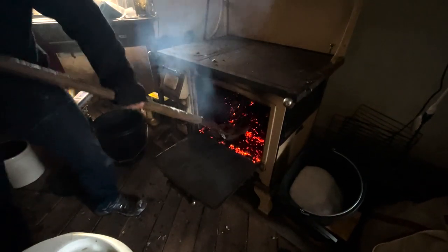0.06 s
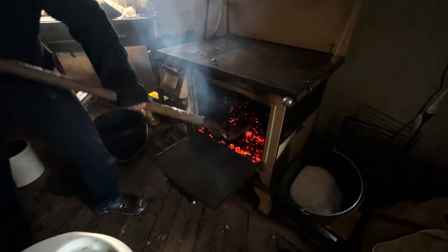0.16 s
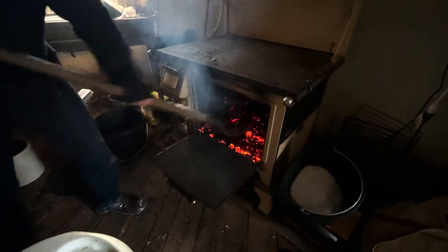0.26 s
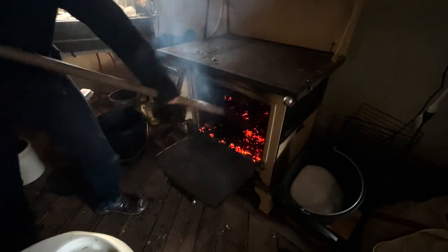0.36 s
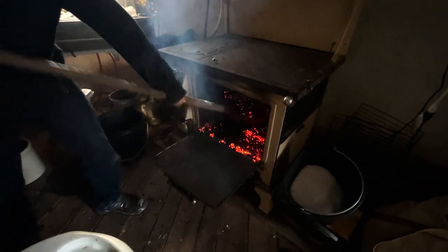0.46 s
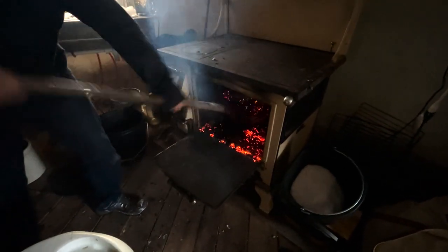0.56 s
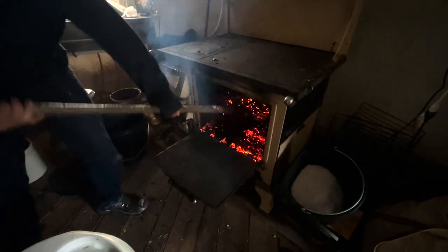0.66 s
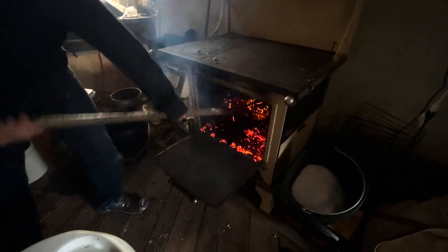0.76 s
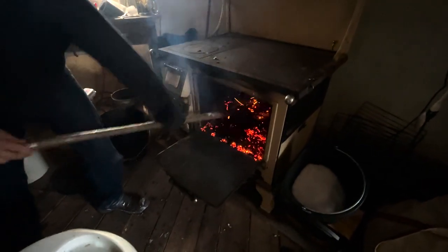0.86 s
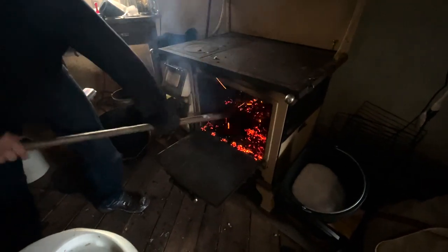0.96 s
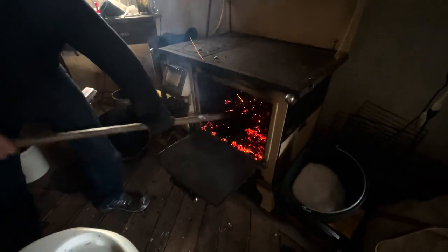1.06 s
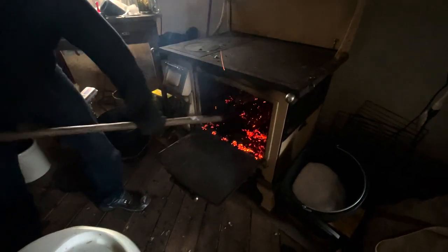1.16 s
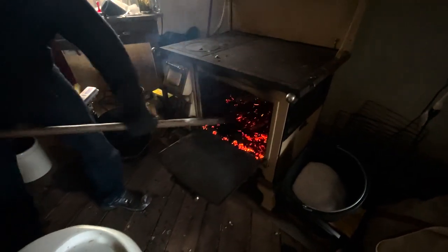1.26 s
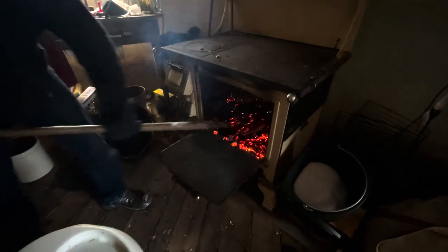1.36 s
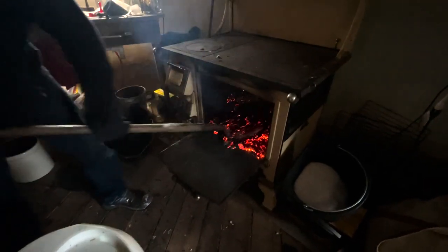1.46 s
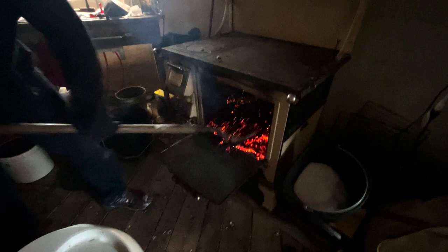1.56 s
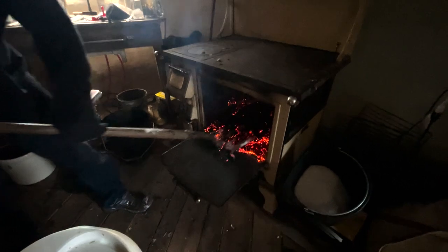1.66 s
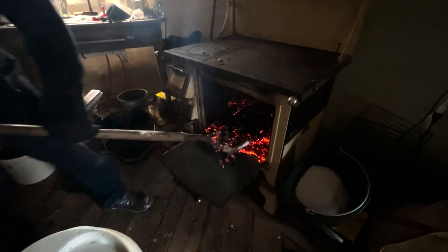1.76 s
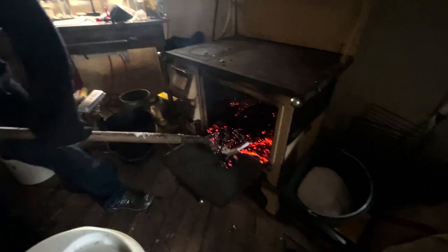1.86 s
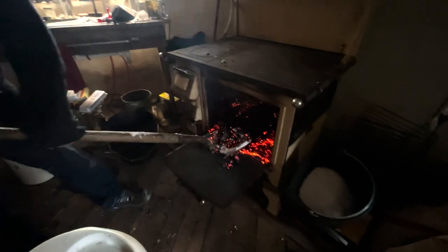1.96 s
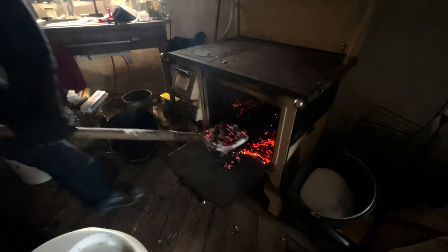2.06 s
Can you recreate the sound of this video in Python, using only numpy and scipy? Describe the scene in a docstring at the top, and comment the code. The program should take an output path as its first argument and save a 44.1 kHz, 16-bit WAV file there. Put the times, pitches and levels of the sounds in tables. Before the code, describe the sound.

A steel poker bangs and rakes through hot coals inside a stove, then embers spill.

```python
"""A steel poker groans and scrapes in the firebox of an iron wood stove, pushed in and dragged back, in a small room.
Stick-slip contacts and knocks drive damped plate modes: boom, clank, scrape; some slips lock to one pitch.
Coals crunch under it: dense random cracks, coloured; heavy blows also shake the bed and zing the tip.
Then embers spill over the sill and patter on ringing sheet metal; a few clink as decaying sines.
Shaped noise makes the faint draught throughout."""
import sys
import numpy as np
from scipy import signal
from scipy.fft import rfft, irfft
from scipy.io import wavfile
from scipy.ndimage import uniform_filter1d

SR = 44100
rng = np.random.default_rng(int(sys.argv[2]) if len(sys.argv) > 2 else 0)


def transcribe(signal):
    """Save signal, clipped to [-1, 1], as a 16-bit WAV file at the path in sys.argv[1]."""
    frames = np.atleast_2d(signal).T
    limited = np.clip(frames, -1, 1)
    pcm = np.round(limited * 32767).astype(np.int16)
    wavfile.write(sys.argv[1], SR, pcm)


N = 92610
TIME = np.arange(N) / SR

# Pitched stick-slip of the poker: start_s, length_s, start_hz, end_hz, peak_db
POKER_GROANS = [(-.06, 0.21, 157, 152, -34.5), (0.454, 0.12, 338, 333.5, -26),
                (.738, 0.032, 121, 110, -15.5), (.9, 0.13, 88.5, 102.2, -23.5),
                (1.1, 0.27, 178.7, 181.3, -35), (1.269, 0.079, 412.4, 372, -26.5),
                (1.672, 0.1, 1332, 1315, -44), (1.79, .12, 1310, 1267, -46.5)]
# Poker drag, before mix trims: time_s, boom_db, grind_db, crunch_db
POKER_DRAG = [(0, -35.5, -35, -38.5), (.09, -48, -54, -47.5), (.14, -49, -49, -43), (.21, -41, -37, -29.5),
              (.255, -22, -24.5, -23), (.32, -28, -24, -29.5), (.385, -18.5, -22, -29.5),
              (.46, -22.5, -25, -35.5), (.52, -27, -28, -30), (.56, -25.5, -24.5, -35.5),
              (.6, -32, -36.5, -39), (.66, -32, -35.5, -41), (.7, -18.5, -27, -43.5),
              (.75, -19.5, -33, -42), (.8, -35, -46.5, -44), (.87, -25, -33, -45), (.94, -35.5, -30, -41),
              (1.02, -32, -33, -41.5), (1.08, -34, -35, -43), (1.14, -29.5, -33.5, -39.5),
              (1.21, -33.5, -40.5, -44), (1.3, -34.5, -32.5, -45.5), (1.36, -41, -52, -50.5),
              (1.41, -44, -44.5, -44), (1.47, -50, -67, -51.5), (1.6, -65, -94, -51), (2, -68, -80, -60.5)]
BOOM, GRIND, CRUNCH = 1, 2, 3  # columns
# Poker knocks, before mix trims: start_s, burst_sigma_s, thud_db, clank_db, rasp_db, crack_db, pitch_ratio
POKER_KNOCKS = [(.003, 0.0033, -36, -41, -44, -78, 0.94), (0.286, 0.017, -24, -25, -25.5, -22.5, 0.97),
                (0.292, 0.0066, -13, -11, -22, -40, 0.93), (0.417, 0.013, -12, -15.5, -54, -23, .74),
                (0.43, 0.021, -14.5, -12.5, -29, -28.5, 0.89), (0.488, 0.0056, -42, -33, -35, -34, 1.37),
                (0.546, 0.005, -29, -32, -44, -26, 1.01), (0.677, 0.018, -37, -21.5, -26.5, -40, 0.87),
                (0.715, 0.032, -26, -24, -44, -56, 0.827), (0.82, 0.017, -26.5, -33, -36, -28.5, 1.02),
                (.896, 0.0055, -30, -33, -37, -32, 0.96), (0.911, 0.034, -32, -21.5, -44, -52, 1.05),
                (1.083, 0.019, -53, -48, -28.5, -29.5, 1), (1.106, 0.0053, -47, -28, -27.5, -27.5, 1.21),
                (1.115, 0.011, -44, -28, -35, -58, 1.064), (1.174, 0.011, -51, -22.5, -51, -70, 1.2),
                (1.218, 0.026, -53, -50, -34, -37, 1.1), (1.259, 0.0056, -39, -48, -23, -49, 1.08),
                (1.286, 0.0013, -51, -48, -26, -32, 1.15), (1.475, 0.011, -56, -56, -40, -49, 1.4)]
THUD, CLANK, RASP, CRACK = 2, 3, 4, 5  # columns
# Stove plate modes: freq_hz, level_db, t60_s
STOVE_MODES = [(79, -0.5, 0.1), (103, 0.5, 0.18), (148.2, -0.5, 0.2), (177.5, -7.5, 0.11),
               (225.8, -3, 0.16), (272, -10.5, 0.028), (336, -0.5, 0.12), (390.3, -0.5, 0.096),
               (445.7, -11, 0.35), (611, -6, 0.069), (864, 1, 0.1), (914, 4, 0.053), (1047, 1, 0.045),
               (1134, -1.5, 0.036), (1370, -6.5, 0.049), (1295, -3.5, 0.066), (1500, -2.5, 0.086),
               (1632, -7.5, 0.12), (1983, -12, 0.18)]
# Sheet metal modes under the embers: freq_hz, level_db, t60_s
SHEET_MODES = [(389.7, -3, 0.24), (564, -13, 0.17), (982.5, -2.5, 0.22), (1200, -11, 0.092),
               (1310, 4.5, 0.11), (1667, 0.5, 0.069), (2960, -12, 0.045), (4150, -3.5, 0.08)]
# Spectrum of the poker's grit: freq_hz, relative_db (per Hz)
GRIT_COLOUR = [(80, -47), (200, -19), (400, -2.5), (800, 7), (1400, -4.5), (1950, 0.5), (2300, -14.5),
               (3200, -11), (6000, -24.5)]
# Spectrum of cracking coals: freq_hz, relative_db (per Hz)
CRUNCH_COLOUR = [(120, -64), (600, 8), (1500, 7), (2300, -1.5), (3000, 1.5), (3900, -1), (4700, -4.5),
                 (6500, -3.5), (8000, -2.5), (9300, -9), (11500, -9.5), (13800, -17)]
# Spectrum of the shaken coal bed: freq_hz, relative_db (per Hz)
BED_COLOUR = [(70, -8), (190, 4.5), (400, 3.5), (850, -2.5), (1400, -14), (2500, -25), (6000, -39)]
# Spectrum of landing embers: freq_hz, relative_db (per Hz)
EMBER_COLOUR = [(150, -9), (350, -4), (580, 7), (800, -8.5), (1350, 3.5), (2400, -3), (4100, -4.5),
                (5500, -7.5), (8000, -11.5), (11000, -20.5), (13800, -20)]
# Spectrum of the draught: freq_hz, relative_db (per Hz)
DRAUGHT_COLOUR = [(20, -22), (37, 1), (60, 6), (100, 0.5), (180, -10.5), (400, -16), (1200, -33),
                  (3000, -68), (8500, -25.5), (13800, -30.5)]
# Flow of embers over the sill: time_s, level_db
EMBER_SPILL = [(1.475, -51), (1.482, -36.5), (1.5, -33), (1.535, -41), (1.56, -34.5), (1.605, -34),
               (1.66, -39), (1.73, -46), (1.82, -45.5), (1.93, -61), (2.01, -49.5), (2.1, -64)]
# Single clinking embers: start_s, pitch_hz, peak_db, t60_s
EMBER_CLINKS = [(1.495, 13700, -35, 0.034), (1.688, 12630, -38, .03), (1.776, 9700, -37, 0.031),
                (1.946, 4000, -39, 0.0057)]
# Microphone colour: freq_hz, left_minus_right_db
MIC_COLOUR = [(100, -0.8), (1800, 0), (2700, 3), (3900, -0.5), (5800, 2.5), (7400, 0), (9200, -10),
              (10300, -4.5), (11500, 0)]

DRAUGHT_DB = -48.5
GROAN_WAVER = 0.0047  # rms share of pitch
THUD_BELOW_HZ, CLANK_BELOW_HZ, STOVE_LOWEST_HZ = 250, 750, 70
MOVE_STEP_S, DETUNE = 0.06, 0.0433  # modes shift by this share as the contact point moves
BLOW_S, BLOW_T60_S = 0.012, 0.37  # span of a knock's level; damping by the poker's pressure
SNAP = 0.24  # first contact of a knock against its unit-energy burst
JUDDERS_PER_S, SLIPS_PER_S, CRACKS_PER_S, EMBERS_PER_S = 350, 900, 4200, 2600
SLIP_SPREAD_DB, CRACK_SPREAD_DB, EMBER_SPREAD_DB = 3, 3.5, 2.5
BOOM_DB, CLANK_DB, SCRAPE_DB, GRIT_DB, RASP_DB = -1.5, -0.5, -13.5, -2.5, -3.5
CRUNCH_DB, BED_DB, SHEET_DB = 3.5, -6, -5.5
CLUMP_DB, CLUMP_SAMPLES = 0.5, 1100  # rms swing; coals give way in clumps
ZING_DB, ZING_HZ, ZING_WIDTH_HZ = -17.5, 7730, 1600
EARLY_T60_S, EARLY_DB, ROOM_T60_S, ROOM_DB = 0.057, 0.5, 0.22, -6.5
SCATTER_HZ, SCATTER_LOWEST_HZ, SCATTER_STEP_S = 360, 118, 0.025
TREBLE_DB, WET_DB = -4.5, -4.5
RIGHT_LAG_S, MOST_LAG_RAD = 6e-5, 0.84
CLIP_TOP, LOWEST_HZ, CUTOFF_HZ = 1, 33, 13850


def from_db(db):
    """Amplitude ratio from dB."""
    return 10 ** (np.asarray(db) / 20)


def unit(x):
    """Scale to unit energy."""
    return x / np.sqrt(np.sum(x ** 2, axis=-1, keepdims=True) + 1e-20)


def level(rows, column=1):
    """Gain over time from one dB column."""
    rows = np.array(rows)
    return from_db(np.interp(TIME, rows[:, 0], rows[:, column]))


def gains(points):
    """Gain per frequency bin, interpolated in dB over log frequency."""
    hz, db = np.transpose(points)
    bins_hz = np.linspace(1, SR / 2, N + 1)
    return from_db(np.interp(np.log(bins_hz), np.log(hz), db))


def shape(x, gain):
    """Filter by a gain per frequency bin."""
    return irfft(rfft(x, 2 * N) * gain)[..., :N]


def colour(x, points):
    """Give a white signal a spectrum and keep its power."""
    gain = gains(points)
    return shape(x, gain / np.sqrt(np.mean(gain ** 2)))


def butter(order, hz, kind, x):
    """Butterworth filter."""
    return signal.sosfilt(signal.butter(order, hz, kind, fs=SR, output="sos"), x)


def draught():
    """The fire's low rumble and faint hiss: shaped noise, wider in stereo at the top."""
    apart = butter(1, 400, "high", rng.standard_normal(N))
    sides = np.outer([1, -1], apart) * 0.84
    return from_db(DRAUGHT_DB) * colour(rng.standard_normal(N) + sides, DRAUGHT_COLOUR)


def groans():
    """Stick-slip locks to one gliding, wavering pitch: the poker groans or squeaks."""
    out = np.zeros(N)
    for start_s, length_s, start_hz, end_hz, peak_db in POKER_GROANS:
        through = np.clip((TIME - start_s) / length_s, 0, 1)
        waver = uniform_filter1d(rng.standard_normal(N), size=400)
        glide_hz = start_hz + (end_hz - start_hz) * through
        hz = glide_hz * (1 + GROAN_WAVER * waver / waver.std())
        swell = np.sqrt(np.abs(np.sin(np.pi * through)))
        phase = 2 * np.pi * np.cumsum(hz * (through > 0)) / SR
        out += from_db(peak_db) * swell * np.sin(phase)
    return out


def contacts(per_s, spread_db):
    """Random tiny impacts of uneven size, power evened over 1100 samples to about rms 1."""
    excess = np.minimum(rng.exponential(1, N), 5)
    sizes = from_db(spread_db * excess) * rng.choice([-1, 1], N)
    clicks = sizes * (rng.random(N) < per_s / SR)
    power = uniform_filter1d(clicks ** 2, size=1100)
    return clicks / np.sqrt(np.maximum(power, 1e-3))


def alternating(modes):
    """Opposite signs for neighbouring modes."""
    return (-1) ** np.arange(len(modes))[:, None]


def ring(force, modes, detune):
    """Drive damped modes that shift a little as the contact point moves."""
    t, step = TIME[:SR // 4], int(MOVE_STEP_S * SR)
    hz, db, t60_s = np.transpose(modes)[..., None]
    decay = from_db(db - 60 * t / t60_s) * alternating(modes)
    out = np.zeros(2 * N)
    for i in range(0, N, step):
        shifted_hz = hz * (1 + detune * rng.uniform(-0.69, 1, hz.shape))
        phase = (2 * np.pi * shifted_hz * t).astype(np.float32)
        response = np.sum(decay * np.sin(phase), axis=0)
        piece = signal.fftconvolve(force[i:i + step], unit(response))
        out[i:i + len(piece)] += piece
    return out[:N]


def knock_force(column, chatter):
    """Each knock is one sharp contact and a dying burst of small ones."""
    force = np.zeros(N)
    for row in POKER_KNOCKS:
        start = max(int(row[0] * SR), 0)
        fade = np.exp(-(TIME[:N - start] / row[1]) ** 2 / 2)
        burst = unit(chatter[start:] * fade)
        burst[0] += SNAP
        force[start:] += from_db(row[column]) * np.sqrt(BLOW_S * SR) * unit(burst)
    return force


def blow(modes, column):
    """Each knock strikes the plates once; the poker's pressure damps them and shifts their pitch."""
    out, t = np.zeros(N + SR), TIME[:SR // 5]
    hz, db, t60_s = np.transpose(modes)[..., None]
    decay = from_db(db - 60 * (1 / t60_s + 1 / BLOW_T60_S) * t) * alternating(modes)
    for row in POKER_KNOCKS:
        start = max(int(row[0] * SR), 0)
        pitch_ratio = row[-1]
        rung = unit(np.sum(decay * np.sin(2 * np.pi * hz * pitch_ratio * t), axis=0))
        out[start:start + len(t)] += from_db(row[column]) * np.sqrt(BLOW_S * SR) * rung
    return out[:N]


def poker():
    """Stick-slip and hard knocks shake the stove's low, middle and high modes; grit rasps along."""
    low = [m for m in STOVE_MODES if m[0] < THUD_BELOW_HZ]
    middle = [m for m in STOVE_MODES if THUD_BELOW_HZ <= m[0] < CLANK_BELOW_HZ]
    high = [m for m in STOVE_MODES if m[0] >= CLANK_BELOW_HZ]
    slips = contacts(SLIPS_PER_S, SLIP_SPREAD_DB)
    grind = slips * level(POKER_DRAG, GRIND)
    judder = contacts(JUDDERS_PER_S, 1.4) * level(POKER_DRAG, BOOM)
    boom = ring(from_db(BOOM_DB) * judder, low, DETUNE)
    blows = blow(low, THUD) + blow(middle, CLANK)
    rasp = from_db(RASP_DB) * knock_force(RASP, slips)
    clank = ring(from_db(CLANK_DB) * grind, middle, 1.16 * DETUNE)
    scrape = ring(from_db(SCRAPE_DB) * grind + rasp, high, DETUNE)
    stove = butter(3, STOVE_LOWEST_HZ, "high", boom + blows + clank + scrape)
    grit = colour(from_db(GRIT_DB) * grind + rasp, GRIT_COLOUR)
    return stove + grit


def coals():
    """Brittle coals crunch in clumps and crack at knocks; heavy blows shake the bed and zing the steel tip."""
    cracks = contacts(CRACKS_PER_S, CRACK_SPREAD_DB)
    clumps = uniform_filter1d(rng.standard_normal(N), size=CLUMP_SAMPLES)
    clump_gain = from_db(CRUNCH_DB + CLUMP_DB * clumps / clumps.std())
    crunch = clump_gain * cracks * level(POKER_DRAG, CRUNCH)
    heavy = knock_force(CLANK, contacts(CRACKS_PER_S, 1.2))
    band_hz = [ZING_HZ - ZING_WIDTH_HZ / 2, ZING_HZ + ZING_WIDTH_HZ / 2]
    band_gain = np.sqrt(SR / np.pi / ZING_WIDTH_HZ)  # makes up for the narrow band
    zing = from_db(ZING_DB) * band_gain * butter(1, band_hz, "band", heavy)
    brittle = colour(crunch + knock_force(CRACK, cracks), CRUNCH_COLOUR)
    bed = from_db(BED_DB) * colour(heavy, BED_COLOUR)
    return brittle + bed + zing


def spill():
    """A shower of embers patters on ringing sheet metal; a few clink like glass."""
    shower = contacts(EMBERS_PER_S, EMBER_SPREAD_DB) * level(EMBER_SPILL)
    patter = colour(shower, EMBER_COLOUR)
    out = patter + from_db(SHEET_DB) * ring(shower, SHEET_MODES, DETUNE)
    for start_s, hz, peak_db, t60_s in EMBER_CLINKS:
        age_s = np.maximum(TIME - start_s, 0)
        decay = from_db(peak_db - 60 * np.minimum(age_s / t60_s, 3))
        out = out + decay * np.sin(2 * np.pi * hz * age_s)
    return out


def room(x):
    """Near surfaces scatter all but the bass, afresh as the source moves; a short tail follows."""
    t, step = TIME[:SR // 3], int(SCATTER_STEP_S * SR)
    decay = 0
    for db, t60_s in ((EARLY_DB, EARLY_T60_S), (ROOM_DB, ROOM_T60_S)):
        decay = decay + from_db(db) * unit(from_db(-60 * t / t60_s) * (t > 0.001))
    bass = butter(1, SCATTER_HZ, "low", x)
    treble = x - bass
    scattered = butter(2, SCATTER_LOWEST_HZ, "high", treble)
    padded, wet = np.pad(scattered, (step, 2 * step)), np.zeros((2, 2 * N))
    fade = np.sin(np.pi * np.arange(2 * step) / (2 * step))
    for i in range(0, N + step, step):
        echoes = decay * rng.standard_normal((2, len(t)))
        piece = signal.fftconvolve((fade * padded[i:i + 2 * step])[None], echoes, axes=1)
        wet[:, i:i + piece.shape[1]] += piece
    direct = bass + from_db(TREBLE_DB) * treble
    bins_hz = np.linspace(0, SR / 2, N + 1)
    lag_rad = np.minimum(2 * np.pi * bins_hz * RIGHT_LAG_S, MOST_LAG_RAD)
    both = np.array([direct, shape(direct, np.exp(-1j * lag_rad))])
    return both + from_db(WET_DB) * wet[:, step:step + N]


def scene():
    """Stove sounds pass through the room; the draught is added dry."""
    return room(poker() + groans() + coals() + spill()) + draught()


def record(dry):
    """Each microphone has its own colour; peaks are rounded, the bottom and the top are cut."""
    tilt = np.sqrt(gains(MIC_COLOUR))
    coloured = shape(dry, np.array([tilt, 1 / tilt]))
    rounded = CLIP_TOP * np.tanh(coloured / CLIP_TOP)
    x = butter(3, LOWEST_HZ, "high", rounded)
    return signal.sosfilt(signal.ellip(10, 0.3, 70, CUTOFF_HZ, fs=SR, output="sos"), x)


dry = scene()
out = record(dry)
transcribe(out)
```